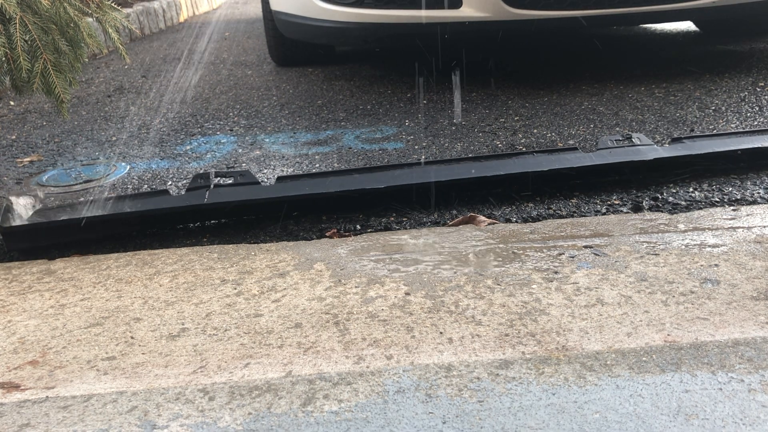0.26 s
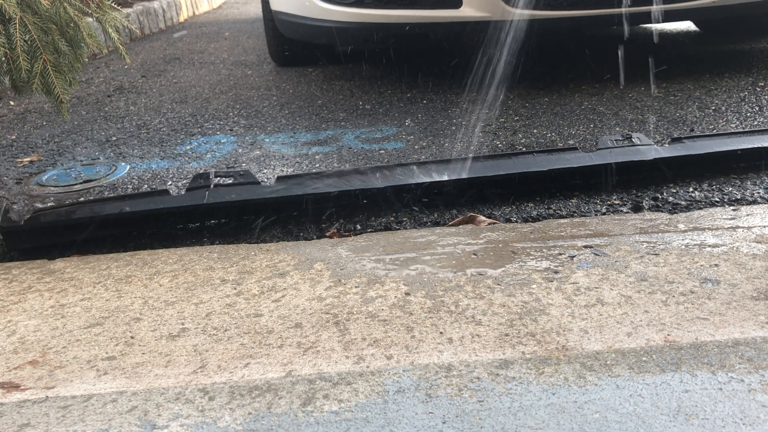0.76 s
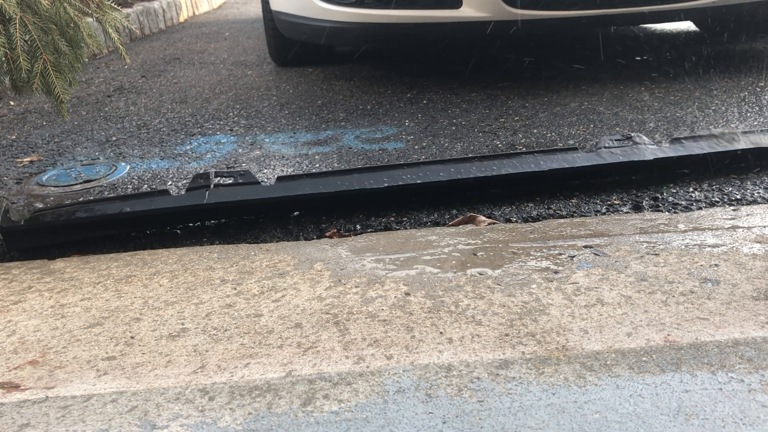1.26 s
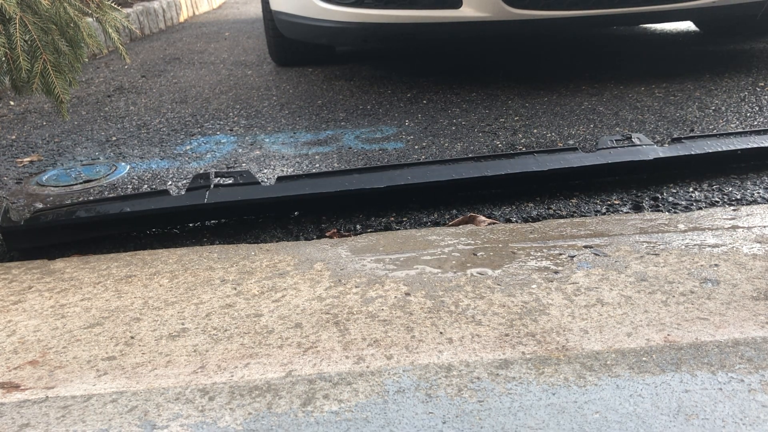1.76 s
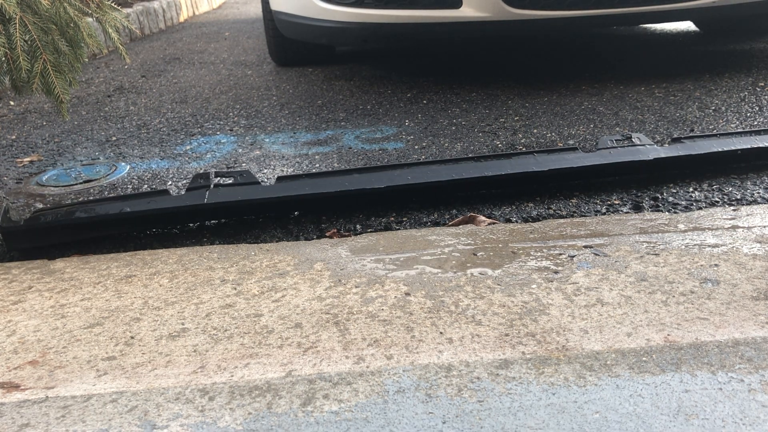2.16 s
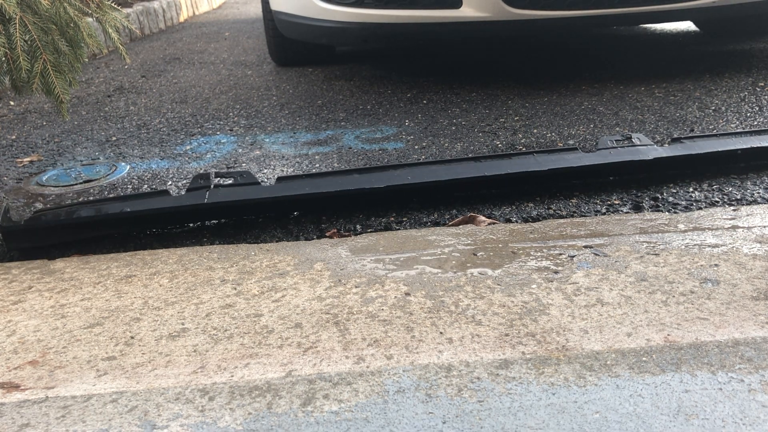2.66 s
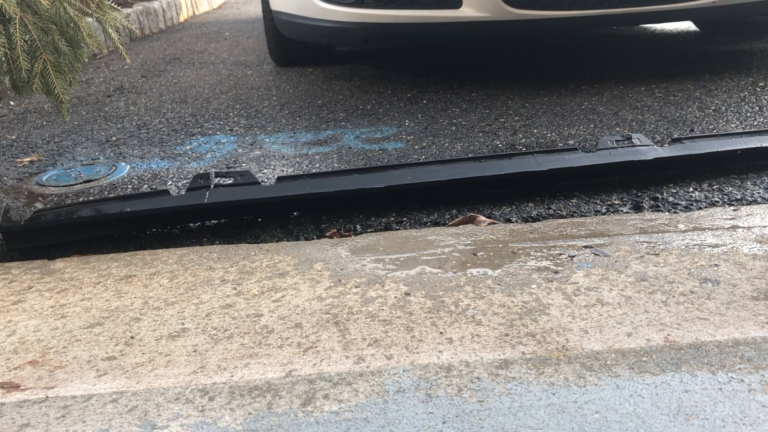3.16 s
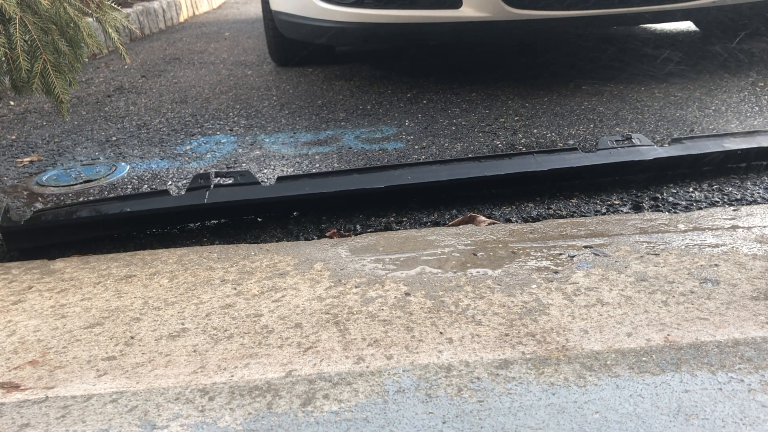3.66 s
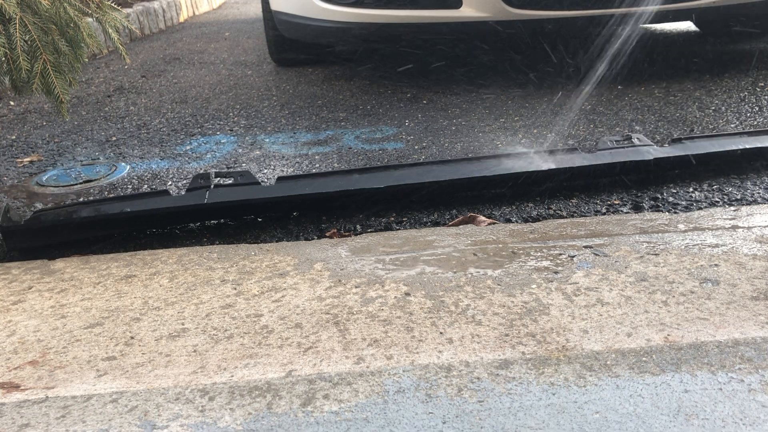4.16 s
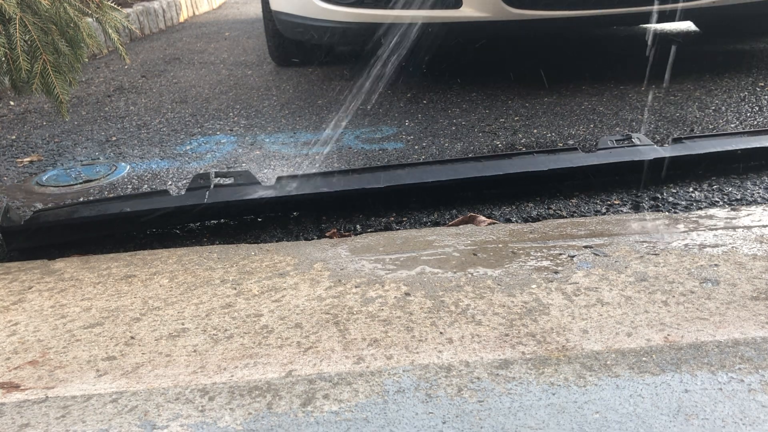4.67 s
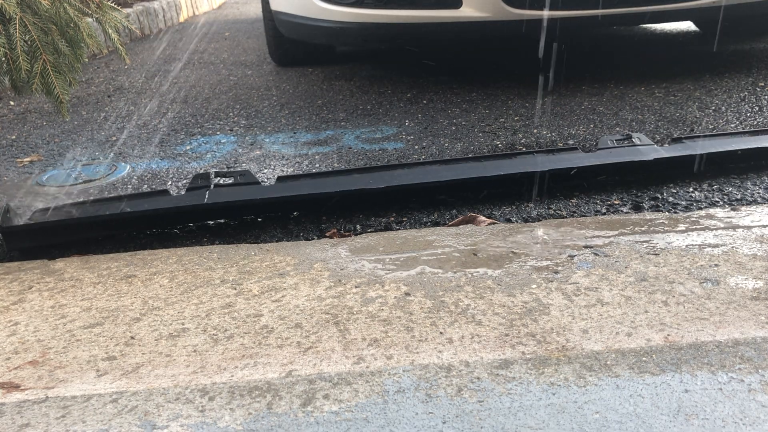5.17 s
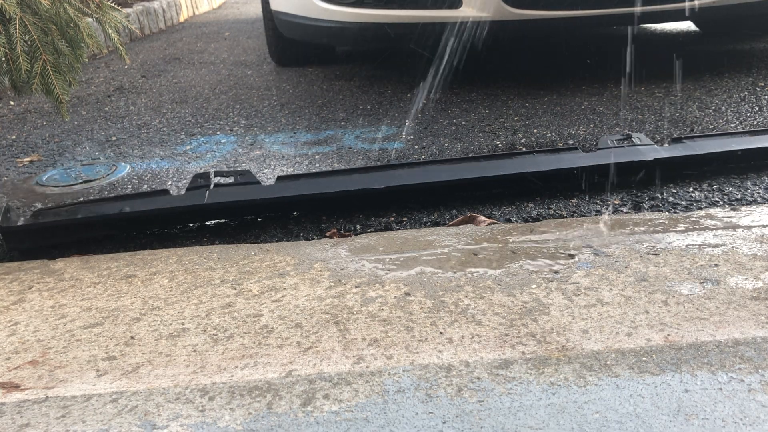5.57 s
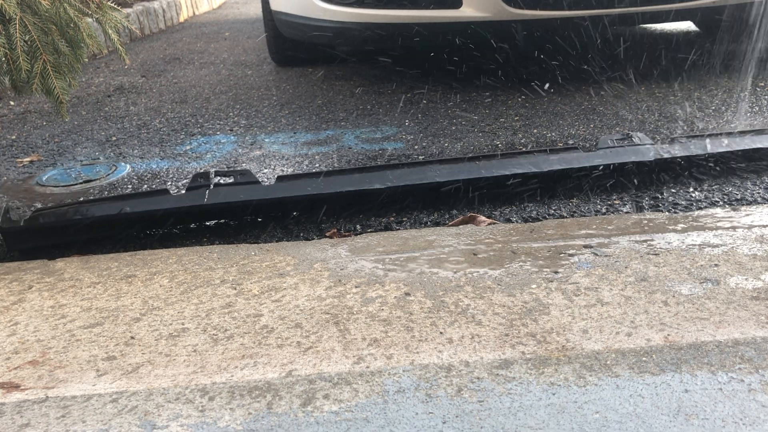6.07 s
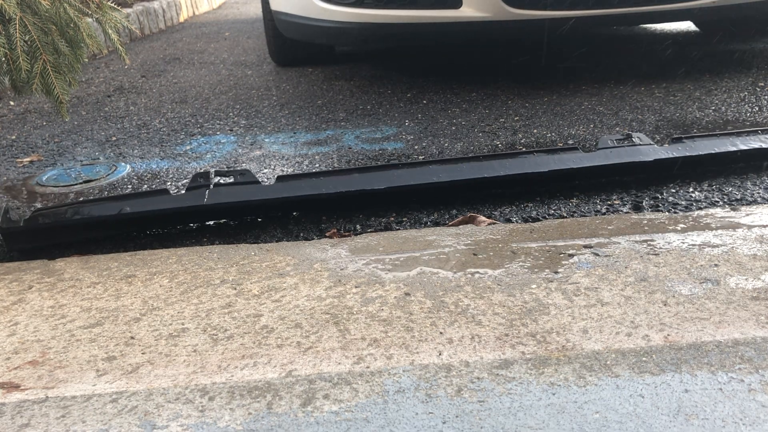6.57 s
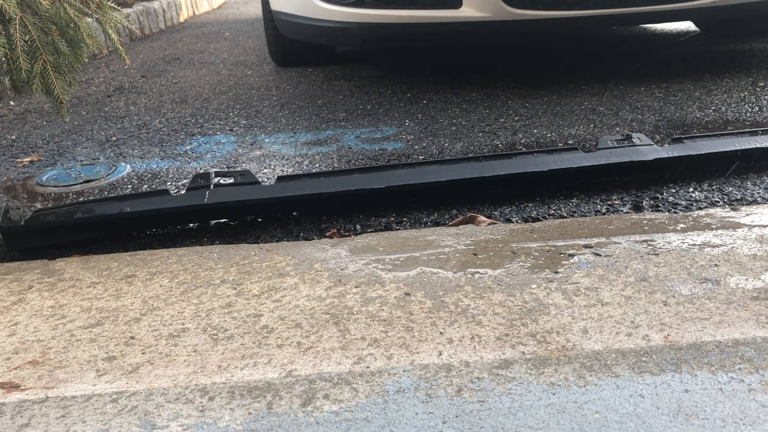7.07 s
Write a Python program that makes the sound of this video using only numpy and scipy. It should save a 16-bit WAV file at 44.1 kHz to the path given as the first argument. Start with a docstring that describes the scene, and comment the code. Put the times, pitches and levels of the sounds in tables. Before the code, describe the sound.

Close to the ground, a hose spray rattles on plastic with a hollow, mid-pitched clatter that shifts pitch as the jet moves, while bright water crackle splashes on hard wet pavement. Brief gaps leave mostly slaps and spatter, and dull thuds come from the car's panels. Then the spray abruptly ends, and scattered drips tick into puddles over a quiet far-off street rumble with faint engine tones. Open air, little echo.

```python
"""A garden hose is swept to and fro over a car's lower panels and a plastic trim piece lying on a driveway.
From the start the jet drums on the hollow plastic, where random blows excite panel and air resonances,
and spatters on the asphalt as noise bursts and ringing drops; then it shuts off and the car drips.
Distant traffic hums throughout as shaped noise, joined in the later part by the tones of two engines."""
import sys
import numpy as np
from scipy import signal
from scipy.fft import rfft, irfft
from scipy.io import wavfile
from scipy.ndimage import uniform_filter1d, map_coordinates

SR = 44100
rng = np.random.default_rng(int(sys.argv[2]) if len(sys.argv) > 2 else 0)


def to_wav(sig):
    """Store sig (one row per channel, or 1-D mono) as 16-bit WAV at the path in sys.argv[1].

    Samples outside -1..1 are clipped; the rate is SR.
    """
    pcm = np.clip(np.atleast_2d(sig), -1, 1) * 32767
    pcm = np.round(pcm).astype(np.int16)
    wavfile.write(sys.argv[1], SR, pcm.T)  # frames by channels


N = 322371
TIME = np.arange(N) / SR   # seconds

# The jet catches the plastic. Each row: start and end in seconds, drumming level in dB at the start,
# in the middle and at the end, pitch of the struck spot in Hz at the start and at the end,
# and ring of that spot in dB relative to the other resonances.
PASSES = [(0.044, 0.374, -42.5, -40.5, -39, 1190, 1280, -9),
          (0.535, 1.114, -41, -39, -35.5, 1790, 1750, -2), (1.11, 1.373, -37.5, -38, -40, 2560, 2240, -8),
          (1.37, 1.886, -35.5, -37, -37, 2380, 1970, -4), (2.08, 2.283, -37, -42, -37.5, 1900, 1850, -8),
          (2.445, 2.547, -45.5, -39, -42, 1990, 1700, -9),
          (2.751, 3.486, -37, -36.5, -41, 1940, 2100, -4.5),
          (3.533, 3.754, -38, -42, -37.5, 2200, 2260, -6),
          (3.76, 4.134, -42.5, -39.5, -38.5, 1310, 1200, -6),
          (4.18, 4.618, -37.5, -38, -40, 1770, 1660, -2),
          (4.626, 5.086, -46.5, -44, -47.5, 1680, 1400, -8.5), (5.245, 5.52, -43, -42, -41, 1100, 1020, -4),
          (5.801, 5.893, -39, -41.5, -39.5, 1750, 1940, -6), (5.95, 5.975, -42, -33.5, -46, 1700, 1670, 6),
          (6.048, 6.085, -34.5, -39, -40, 1730, 1700, -17),
          (6.343, 6.441, -38, -38, -40.5, 2000, 2600, -6.5)]
# The last of the jet lands and the spatter dies away.
SHUT_OFF_S, SHUT_OFF_DB_PER_S = 6.41, 165
# The drumming and the boom fade as the jet slides off.
LEAVE_DB_PER_S = 294


def panel(slugs, clump_db=2.0, node_db=2.4, patter_db=-10.0, spot_width_hz=176.0, wander_octaves=0.031,
          focus_db=3, focus_octaves=0.62):
    """Modal excitation: blows of water ring hollow plastic, most strongly in modes near the struck spot's pitch."""
    # Resonances of the plastic. Each row: frequency in Hz, width in Hz, relative strength in dB before focus.
    panel_modes = [(954, 290, 8), (1240, 590, 7), (1520, 290, 6.5), (1790, 170, 5.5), (2124, 370, 6),
                   (2460, 240, 3.5), (2835, 520, 2.5), (3500, 2100, -0.5)]
    # Dull patter between the resonances. Each row: frequency in Hz, relative spectrum level in dB.
    patter_spectrum = [(120, -54), (330, -12), (470, -8.5), (750, -15), (1200, 9.5), (2300, -7),
                       (3200, -16), (5000, -9), (16000, -10)]
    # Jet on the car's wide panels. Each row: time in seconds, thud level in dB.
    thud_curve = [(0, -53), (1.7, -67), (2.2, -55.5), (3, -60.5), (4.1, -51.5), (4.65, -47.5), (5.2, -54),
                  (5.51, -44.5), (5.55, -63.5), (6.4, -68), (6.6, -90)]

    drum_db = drumming()
    thud_db, = in_time(thud_curve)
    spot_hz, spot_db = struck_spot()
    blows = impacts(per_s=1700, spread_db=1.5, biggest=3.44) * from_db(clump_db * slugs)

    rings = 0
    for hz, width_hz, db in panel_modes:
        distance_octaves = np.log2(hz / spot_hz)
        aim_db = focus_db * np.exp(-(distance_octaves / focus_octaves) ** 2)
        # soft contacts, each on a spot of its own
        force = resonance(blows * rng.standard_normal(N), hz, hz / 2)
        mode_db = db + aim_db + node_db * drift(7)
        rings = rings + resonance(force, hz, width_hz) * from_db(mode_db)

    # the hand shakes the jet about
    spot_hz = spot_hz * 2 ** (wander_octaves * drift(16))
    spot_gain = from_db(spot_db)
    spot_ring = ringing(blows, spot_hz, spot_width_hz)
    body = (evened(rings) + spot_gain * spot_ring) / np.hypot(1, spot_gain)
    body = body + from_db(patter_db) * evened(coloured(blows, patter_spectrum))

    # wide sheets answer low and dull
    thud = resonance(resonance(blows, 426, 410), 635, 430)
    return from_db(drum_db) * body + boom(blows, drum_db) + from_db(thud_db) * evened(thud)


def drumming(catch_db_per_s=1400):
    """Excitation level in dB: the strongest of the passes and of the stray drops sets the drumming."""
    # Stray drops that reach the plastic between passes. Each row: time in seconds, drumming level in dB.
    stray = [(0.45, -44), (2.0, -51.5), (2.7, -42), (5.2, -51), (5.5, -40.5), (5.65, -68), (6.4, -61)]
    stray_db, = in_time(stray)
    swells = [stray_db + held(0, SHUT_OFF_S, 0, SHUT_OFF_DB_PER_S)]
    for start, end, first_db, middle_db, last_db, *_ in PASSES:
        pass_db = np.interp(TIME, [start, (start + end) / 2, end], [first_db, middle_db, last_db])
        # an abrupt start as the jet arrives
        swells.append(pass_db + held(start, end, catch_db_per_s, LEAVE_DB_PER_S))
    return np.max(swells, axis=0)


def struck_spot():
    """Local resonance: the pitch and strength of the spot under the jet, the pitch gliding through each pass."""
    points = []
    for start, end, *_, first_hz, last_hz, db in PASSES:
        points += [(start, first_hz, db), (end, last_hz, db)]
    return in_time(points)


def boom(blows, drum_db, faint_db=-17.5, rise_db_per_s=450, waver_db=1.5):
    """Air-column resonance: the trim hums faintly under all drumming and booms when its hollow is hit."""
    # The jet hits the hollow squarely. Each row: start and end in seconds, boom in dB before the waver.
    booms = [(.13, 0.35, -49), (0.602, 1.07, -48), (0.818, .845, -41), (.992, 1.008, -40),
             (4.203, 4.59, -44), (4.698, 4.73, -46), (5.806, 5.885, -41.5)]
    # The air column shifts with the jet. Each row: time in seconds, reference pitch in Hz.
    tube_pitch = [(.9, 578), (1.7, 547), (3.8, 563), (4.26, 587), (4.75, 554), (5.5, 550), (5.8, 598)]
    # Nearly harmonic air modes. Each row: multiple of the reference pitch, width in Hz, gain in dB.
    tube_modes = [(0.999, 54, 0), (1.97, 119, -3)]

    tube_hz, = in_time(tube_pitch)
    swells = [db + held(start, end, rise_db_per_s, LEAVE_DB_PER_S) for start, end, db in booms]
    boom_db = np.max(swells + [drum_db + faint_db], axis=0)
    # the boom comes and goes with the shake of the hose
    boom_db = boom_db + waver_db * drift(25)
    air = 0
    for multiple, width_hz, db in tube_modes:
        air = air + from_db(db) * ringing(blows, multiple * tube_hz, width_hz)
    return from_db(boom_db) * air


def ringing(blows, hz, width_hz):
    """Forced resonance: soft blows set one gliding mode ringing, evened to unit power."""
    soft_blows = gliding(blows, hz, 3 * width_hz)
    return evened(gliding(soft_blows, hz, width_hz))


def gliding(x, hz, width_hz):
    """Heterodyne resonance: shift a moving centre to zero, low-pass, and shift back, with gain 1 on top."""
    turn = np.exp(2j * np.pi * np.cumsum(hz) / SR)
    keep = np.exp(-np.pi * width_hz / SR)
    return 2 * np.real(turn * signal.lfilter([1 - keep], [1, -keep], x / turn + 1e-18))


def spatter(slugs, clump_db=1.5, cycles=1.97, pitch_octaves=0.93, mist_db=-3.0, patchy_db=4.0):
    """Impact noise with damped resonance: drops snap and ring for a cycle or two over the smooth hiss of mist."""
    # Size of the drops. Each row: time in seconds, pitch in Hz at which most of them burst
    # (fine spray is higher), their ringing sizzle in dB relative to the unpitched crackle and mist.
    drop_pitch = [(0, 6030, -30), (.35, 8650, -6), (.8, 8040, -12), (1.1, 4500, -20), (1.8, 4970, -14),
                  (2.0, 11900, -6), (2.22, 4840, -10), (2.38, 10800, -53), (2.8, 4870, -15), (3.1, 9200, 0),
                  (3.45, 9900, 2), (3.9, 11100, -2.5), (4.25, 8800, 1), (4.6, 8600, 2), (4.95, 7360, 0),
                  (5.3, 9460, -1.5), (5.6, 7400, 2), (6.3, 7260, -2), (6.9, 7660, -11), (7.15, 5100, 0)]
    # Water bursting on hard surfaces. Each row: frequency in Hz, relative spectrum level in dB.
    splash_spectrum = [(150, -29), (400, -24), (1000, -11.5), (2000, -6), (3200, -2.5), (5000, 0.5),
                       (7000, 0.5), (8800, 2), (11000, 1.5), (16000, 2.5)]

    usual_hz, sizzle_db = in_time(drop_pitch)
    clumps = from_db(clump_db * slugs)
    hits = evened(impacts(per_s=2600, spread_db=4.5, biggest=3.38) * clumps)
    mist = from_db(mist_db) * evened(rng.standard_normal(N) * clumps)
    bursts = with_spray(hits, t60=0.01, spray_db=1.5) + mist

    count = 8
    dealt = rng.integers(0, count, N)   # deals every sample to one pitch
    grains = 0
    for k, hz in enumerate(np.geomspace(2800, 15000, count)):
        # drops of one size come in flurries
        closeness = np.exp(-(np.log2(hz / usual_hz) / pitch_octaves) ** 2)
        share = closeness * from_db(patchy_db * drift(50))
        # a drop and its spray share one pitch
        own_hits = with_spray(hits * (dealt == k), t60=0.0079, spray_db=-5.0)
        own = own_hits + mist * (dealt == k)
        width_hz = hz / cycles
        grains = grains + share * resonance(resonance(own, hz, width_hz), hz, width_hz)

    crackle = evened(bursts) + from_db(sizzle_db) * evened(grains)
    return from_db(spattering()) * evened(coloured(crackle, splash_spectrum))


def spattering(slap_db_per_s=404):
    """Incoherent sources add in power: steady spray, slaps of the full jet and run-off give the level in dB."""
    # Drops bursting on hard wet surfaces. Each row: time in seconds, spatter level in dB.
    spray = [(0, -34.5), (.33, -34), (.41, -39.5), (.55, -35), (1.1, -35), (1.8, -38.5), (2.25, -42.5),
             (2.75, -40.5), (3.15, -36), (3.7, -34.5), (3.95, -37), (4.55, -35), (4.9, -39.5), (5.4, -36.5),
             (5.9, -36), (6.3, -37)]
    # Water running off afterwards. Each row: time in seconds, trickle level in dB.
    runoff = [(6.4, -63), (6.8, -68), (6.9, -60), (7, -68.5), (7.1, -61), (7.17, -57.5), (7.24, -66),
              (7.31, -56)]
    # The full jet slaps the wet asphalt. Each row: start and end in seconds, spatter level in dB.
    slaps = [(0.473, 0.526, -42), (1.947, 2.097, -36), (2.332, 2.428, -33), (2.51, 2.528, -40),
             (2.578, 2.606, -34.5), (3.86, 3.883, -36.5), (4.035, 4.107, -35.5), (5.993, 6.01, -35),
             (6.147, 6.19, -36), (6.297, 6.393, -36)]

    spray_db, = in_time(spray)
    runoff_db, = in_time(runoff)
    parts = [spray_db + held(0, SHUT_OFF_S, 0, SHUT_OFF_DB_PER_S), runoff_db]
    parts += [db + held(start, end, slap_db_per_s, slap_db_per_s) for start, end, db in slaps]
    return 10 * np.log10(sum(from_db(part) ** 2 for part in parts))


def with_spray(x, t60, spray_db):
    """Energy decay: every burst throws off finer droplets, a fresh hiss that dies away behind it."""
    keep = from_db(-120 / (t60 * SR))   # power falls 60 dB in t60 seconds
    power = signal.lfilter([1 - keep], [1, -keep], x ** 2 + 1e-18)
    return x + from_db(spray_db) * np.sqrt(power) * rng.standard_normal(N)


def single_drops(lowest_hz=2700):
    """Impulse response of single impacts: fat drops slap, slugs knock on plastic, and later drips plink."""
    # Fat drops in the spray. Each row: start in seconds, peak in dB before the high-pass, pitch in Hz.
    fat_drops = [(0.125, -14, 3870), (0.471, -15, 9450), (0.498, -7, 12400), (0.706, -19, 4230),
                 (0.804, -15, 10700), (1.054, -15.5, 8560), (1.404, -27, 3400), (1.963, -14, 12000),
                 (1.977, -18.5, 3980), (2.018, -17, 8690), (2.138, -24, 3500), (2.3091, -17, 9100),
                 (2.393, -14, 8550), (2.424, -15.5, 9600), (2.5, -12.5, 9900), (2.755, -23.5, 3200),
                 (3.423, -15, 10500), (4.7125, -27, 6540), (4.785, -11.5, 5400), (5.068, -15.5, 5470),
                 (5.9169, -17.5, 6800), (5.975, -16, 8900), (5.989, -12.5, 7800), (6.012, -18, 7660),
                 (6.032, -19, 6000), (6.141, -19, 8310), (6.322, -15, 6500), (6.333, -17, 6660)]
    # Heavy slugs of water knock on the plastic. Each row: start in seconds, peak in dB, pitch in Hz.
    slug_knocks = [(0.268, -25, 1180), (0.345, -25, 1200), (0.645, -23, 1820), (0.753, -25, 1690),
                   (0.8205, -23, 2090), (0.9307, -25, 1720), (1.096, -24.5, 1740), (1.123, -23.5, 2450),
                   (2.976, -18, 2130), (3.0513, -21, 2050), (5.954, -31, 1750), (7.278, -40, 980)]
    # Drips from the bodywork land in the puddles.
    # Each row: start in seconds, peak in dB, pitch in Hz, ring in cycles.
    body_drips = [(6.517, -34, 8100, 10), (6.643, -32.5, 10200, 0.78), (6.693, -41, 4930, 20),
                  (6.6989, -34, 13500, 3.9), (6.745, -42, 4700, 5.1), (6.887, -32.5, 8500, 1.02),
                  (7.0414, -34, 4770, 18), (7.044, -33, 2350, 7.9), (7.2677, -28, 8650, 1.4),
                  (7.299, -25, 8900, 3.5)]

    fat = sum(drop(*row, cycles=1.8, snap_db=-18.0, splash_t60=.025, splash_db=-10.0) for row in fat_drops)
    high_pass = signal.butter(2, lowest_hz, "high", fs=SR, output="sos")
    fat = signal.sosfilt(high_pass, fat + 1e-18)
    knocks = sum(drop(*row, cycles=11.0, snap_db=-40.0, splash_t60=0.021, splash_db=4.0) for row in slug_knocks)
    drips = sum(drop(*row, snap_db=-16.0, splash_t60=0.11, splash_db=-18.0) for row in body_drips)
    return fat + knocks + drips


def drop(s, peak_db, hz, cycles, snap_db, splash_t60, splash_db):
    """Impulsive excitation: one drop slaps, rings at its own pitch and throws off a spray of droplets."""
    t = TIME[:SR // 10]
    slap = np.exp(-t / .0007)
    splash = from_db(splash_db - 60 * t / splash_t60)
    force = (t == 0) + (slap + splash) * rng.standard_normal(len(t))
    snap = resonance(force, 4900, 3500)
    sound = resonance(force, hz, hz / cycles) + from_db(snap_db) * snap
    sound = from_db(peak_db) * sound / np.abs(sound).max()
    return np.pad(sound, (int(s * SR), N))[:N]


def bubbles(attack_s=.003, t60=0.073, rise_per_s=2.2, waver=.035):
    """Bubble resonance: trapped air rings softly and rises in pitch as it nears the surface."""
    # Bubbles in the puddles. Each row: start in seconds, level in dB from which it decays, first pitch in Hz.
    puddle_bubbles = [(6.746, -55, 5100), (6.998, -54, 2560)]
    out = 0
    for s, start_db, hz in puddle_bubbles:
        age = np.clip(TIME - s, 0, 2 * t60)
        bubble_hz = hz * (1 + rise_per_s * age + waver * drift(400))
        phase = 2 * np.pi * np.cumsum(bubble_hz) / SR
        attack = np.minimum(age / attack_s, 1)
        out = out + np.sin(phase) * attack * from_db(start_db - 60 * age / t60)
    return out


def traffic(waver_db=1.0, engine_db=7.0, fade_s=0.15):
    """Broadband and tonal sources: tyre rumble from far streets, and engines pulling away or easing off."""
    # Far traffic. Each row: time in seconds, rumble level in dB.
    rumble_curve = [(0, -52.5), (1.5, -52.5), (2.5, -50.5), (5, -49.5), (6, -50), (6.6, -52.5)]
    # Colour of the rumble. Each row: frequency in Hz, relative spectrum level in dB.
    street_spectrum = [(38, -27.5), (56, -1.5), (90, -4), (110, -5.5), (160, -7.5), (220, -13), (310, -21),
                       (600, -26), (1000, -24.5), (1800, -29), (3000, -35.5), (9000, -57)]
    # Far engines. Each row: start and end in seconds, firing rate in Hz at the start and at the end,
    # level in dB before engine_db is added.
    engines = [(4.296, 5.5, 152.2, 140, -60), (5.15, 7.94, 82.5, 99, -61.5)]

    rumble_db, = in_time(rumble_curve)
    out = from_db(rumble_db) * rms_one(coloured(rng.standard_normal(N), street_spectrum))
    for start, end, first_hz, last_hz, db in engines:
        hz = np.interp(TIME, [start, end], [first_hz, last_hz])
        heard = np.clip(np.minimum(TIME - start, end - TIME) / fade_s, 0, 1)
        uneven_hz = hz * (1 + 0.0448 * drift(25))
        firing = np.sqrt(2) * np.sin(2 * np.pi * np.cumsum(uneven_hz) / SR)
        out = out + firing * heard * from_db(db + engine_db + waver_db * drift(8.7))
    return out


def with_tail(x, t60, tail_db):
    """Reverberation: convolution with decaying noise adds a diffuse tail after each sound."""
    t = TIME[:SR // 3]
    tail = rng.standard_normal(len(t)) * from_db(-60 * t / t60)
    return x + from_db(tail_db) * signal.fftconvolve(x, tail / np.linalg.norm(tail))[:N]


def impacts(per_s, spread_db, biggest):
    """Random point process: clicks for many small drops and a few large ones."""
    sizes = from_db(spread_db * np.minimum(rng.exponential(1, N), biggest))
    return sizes * rng.choice([-1, 1], N) * (rng.random(N) < per_s / SR)


def resonance(x, hz, width_hz):
    """Damped oscillator: a two-pole resonance with gain 1 on top."""
    centre_hz = min(hz, .45 * SR)
    sharpness = hz / min(width_hz, SR / 4)
    return signal.lfilter(*signal.iirpeak(centre_hz, sharpness, fs=SR), x + 1e-18)


def coloured(x, spectrum):
    """Minimum phase: folding the cepstrum makes a causal filter with the given spectrum."""
    size = 8192
    hz, db = np.transpose(spectrum)
    bins_hz = np.maximum(np.fft.rfftfreq(size, 1 / SR), 1)
    gains = from_db(np.interp(np.log(bins_hz), np.log(hz), db))
    cepstrum = irfft(np.log(gains))
    cepstrum[1:size // 2] *= 2
    cepstrum[size // 2 + 1:] = 0
    return signal.fftconvolve(x, irfft(np.exp(rfft(cepstrum))))[:N]


def drift(rate):
    """Band-limited chance: a smooth curve with spread 1 that changes about `rate` times a second."""
    knots = rng.standard_normal(8192)
    coarse = TIME[::16]
    curve = map_coordinates(knots, [coarse * rate], order=2, mode="wrap")
    return np.interp(TIME, coarse, rms_one(curve))


def held(start, end, rise_db_per_s, fall_db_per_s):
    """Exponential rise and decay: an envelope in dB that climbs to 0 at the start, holds, then falls."""
    before = rise_db_per_s * np.maximum(start - TIME, 0)
    after = fall_db_per_s * np.maximum(TIME - end, 0)
    return -np.minimum(before + after, 200)


def in_time(rows):
    """Linear interpolation: each column of a curve at every sample."""
    s, *columns = np.transpose(rows)
    return [np.interp(TIME, s, c) for c in columns]


def evened(x):
    """Running power: unit power over every tenth of a second, so that single drops still stand out."""
    return x / np.sqrt(uniform_filter1d(x ** 2, size=SR // 10) + 1e-12)


def rms_one(x):
    """Mean power: scale the whole signal to unit power."""
    return x / np.sqrt(np.mean(x ** 2) + 1e-20)


def from_db(db):
    """Logarithmic level: decibels to amplitude gain."""
    return 10 ** (np.asarray(db) / 20)


def scene():
    """Superposition: the jet breaks into slugs; its sound scatters between car and ground, over traffic."""
    slugs = 0.82 * drift(170) + 0.19 * drift(45) + 0.25 * drift(6.9)
    # the jet wavers on and off the narrow trim
    slugs_on_plastic = 0.65 * slugs + 0.37 * drift(120) + 0.93 * drift(30)
    water = panel(slugs_on_plastic) + spatter(slugs) + single_drops() + bubbles()
    return (with_tail(water, t60=0.1, tail_db=-9.5) + traffic())[None]


def record(dry, cutoff_hz=15950):
    """Band limit: an elliptic low-pass cuts the top steeply."""
    low_pass = signal.ellip(12, .1, 80, cutoff_hz, fs=SR, output="sos")
    return signal.sosfilt(low_pass, dry)


dry = scene()
out = record(dry)
to_wav(out)
```